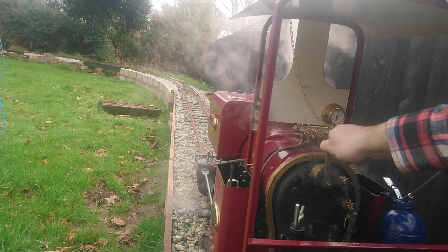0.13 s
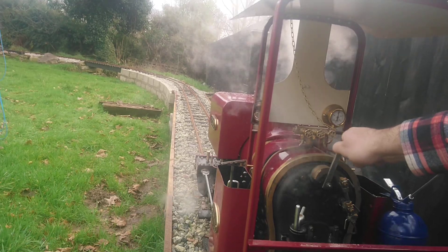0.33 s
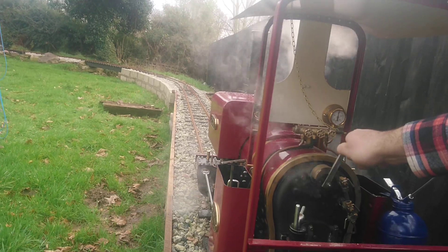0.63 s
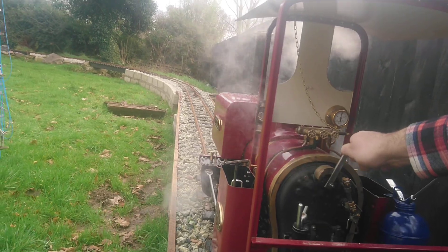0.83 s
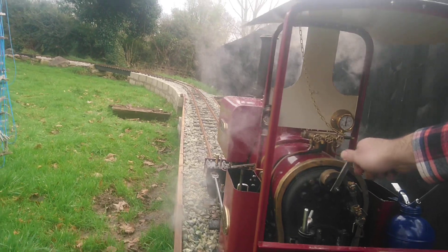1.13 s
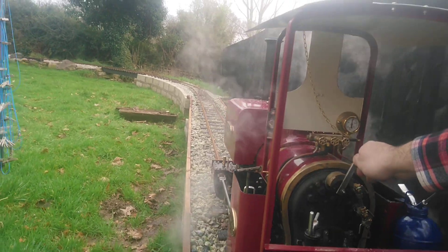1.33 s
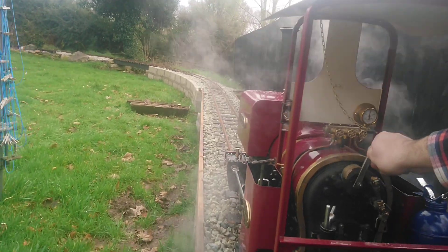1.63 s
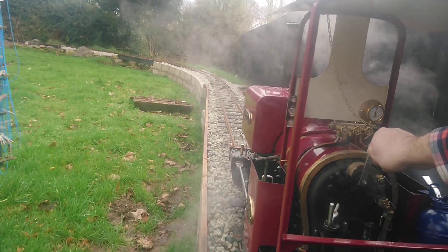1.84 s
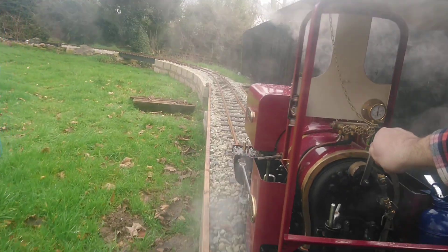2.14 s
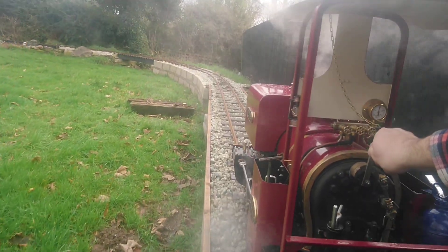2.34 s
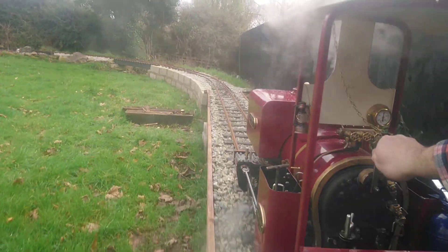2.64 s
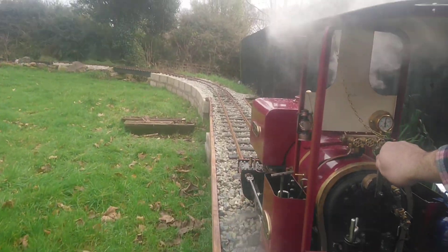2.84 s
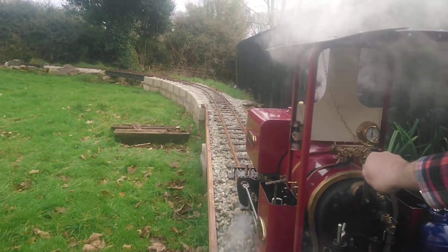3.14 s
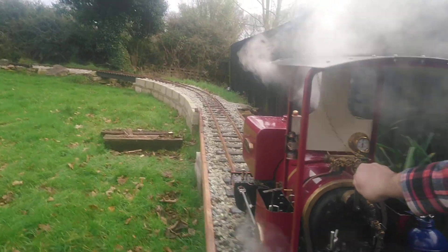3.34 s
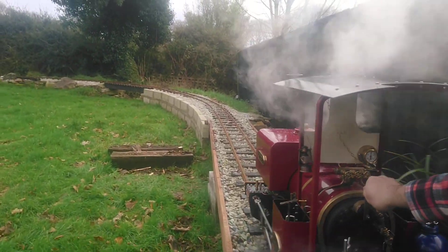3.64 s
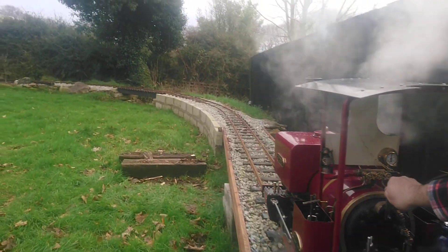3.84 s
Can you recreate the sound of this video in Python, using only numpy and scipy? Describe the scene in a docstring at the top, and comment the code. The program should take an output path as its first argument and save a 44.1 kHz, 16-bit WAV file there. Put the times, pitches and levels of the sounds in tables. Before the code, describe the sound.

A small steam locomotive pulls away on an outdoor garden track, heard close behind the cab: bright steam hiss, a metallic clank, then quickening chuffs over a growing wheel rumble and light rattle.

```python
"""A small steam locomotive pulls away on a garden track, heard from just behind the cab.
Steam first hisses from the open cylinder drains: shaped noise with a top fizz and a whistling edge.
Slack in the running gear closes with a clank, a sum of decaying modes; fainter knocks come later.
Then the chuffs quicken, bursts of noise ringing in the chimney over a draught that swells and sinks,
while the wheels rumble and rattle along the rails as noise and random taps through frame resonances."""
import sys
import numpy as np
from scipy import signal
from scipy.fft import rfft, irfft
from scipy.io import wavfile
from scipy.ndimage import map_coordinates

SR = 44100
rng = np.random.default_rng(int(sys.argv[2]) if len(sys.argv) > 2 else 0)


def generate_wav(signal):
    """Clip the signal to [-1, 1] and save it as 16-bit WAV at the path in sys.argv[1]."""
    frames = np.transpose(np.atleast_2d(signal))
    scaled = np.clip(frames, -1, 1) * 32767
    pcm = np.round(scaled).astype(np.int16)
    wavfile.write(sys.argv[1], SR, pcm)


N = 176400

# likeness of the two microphone signals: frequency_hz, coherence (0 to 1)
COHERENCE = [(60, 0.99), (250, 0.95), (700, 0.89), (1300, 0.54), (2400, 0.46), (4400, 0.58), (8000, 0.061),
             (15000, 0.35)]
# spectrum of rattling and shivering plates: frequency_hz, density_db (dB per Hz, relative)
PLATE_SPECTRUM = [(30, -70), (150, -27), (400, -3), (800, 0), (1300, -1), (2200, -11), (4000, -20),
                  (9000, -33)]


def amp(db):
    """Logarithmic level: decibels become an amplitude gain."""
    return 10 ** (np.asarray(db) / 20)


def evened(x):
    """Normalisation of mean power: scales to rms 1."""
    return x / np.sqrt(np.mean(x ** 2) + 1e-20)


def read(points, hz):
    """Logarithmic frequency scale: interpolates a table along log frequency."""
    f, value = np.transpose(points)
    return np.interp(np.log(hz + 1), np.log(f + 1), value)


def level(points):
    """Amplitude envelope: a level curve, linear in dB, as gain per sample."""
    return amp(np.interp(np.arange(N) / SR, *np.transpose(points)))


def add(mix, s, sound):
    """Linear superposition: mixes a sound in at time s."""
    part = mix[round(s * SR):][:len(sound)]
    part += sound[:len(part)]


def flutter(rate_hz, depth_db):
    """Random amplitude modulation: band-shaped noise sets a gain with an rms swing of depth_db."""
    hz = np.fft.rfftfreq(N, 1 / SR)
    band = hz / (hz + 8) / (1 + (hz / rate_hz) ** 2)
    swing = irfft(rfft(rng.standard_normal(N)) * band, N)
    return amp(depth_db * evened(swing))


def coherent_pair(a, b, coherence):
    """Partial coherence: the right spectrum shares a set part of the left one."""
    return np.array([a, coherence * a + np.sqrt(1 - coherence ** 2) * b])


def coloured(drive, colour, peaks):
    """Source and filter: two drives pass minimum-phase resonances and reach a microphone pair."""
    # left minus right level: frequency_hz, difference_db
    balance = [(60, 2.5), (300, -2), (900, 3.5), (1700, -2.5), (2800, 0.5), (4400, -6), (5400, 3),
               (6500, 13), (8000, 16), (11500, 27), (15000, 11)]
    hz = np.fft.rfftfreq(N, 1 / SR)
    a, b = rfft(drive)
    coherence = np.clip(read(COHERENCE, hz), -1, 1)
    ratio = amp(read(balance, hz))
    sides = np.array([ratio, np.ones_like(hz)]) / np.sqrt(1 + ratio ** 2)
    gain = amp(read(colour, hz)) * sides
    for centre, width, left, right in peaks:
        boost_db = np.array([[left], [right]]) / (1 + (2 * (hz - centre) / width) ** 2)
        gain = gain * amp(boost_db)
    # the Hilbert transform of the log gain gives the phase of a causal response
    mean_gain = gain.mean(0)
    log_gain = np.log(np.r_[mean_gain, mean_gain[-2:0:-1]])
    phase = -signal.hilbert(log_gain).imag[:len(hz)]
    return evened(irfft(coherent_pair(a, b, coherence) * gain * np.exp(1j * phase), N))


def sung(centre_hz, width_hz, pan_db):
    """Narrow-band resonance: noise rings at one pitch, panned left by pan_db, at rms 1."""
    hz = np.fft.rfftfreq(N, 1 / SR)
    resonance = 1 / (1 + 2j * (hz - centre_hz) / width_hz) ** 2
    a, b = rfft(rng.standard_normal((2, N))) * resonance
    left, right = coherent_pair(a, b, np.clip(read(COHERENCE, centre_hz), -1, 1))
    return evened(irfft(np.array([amp(pan_db) * left, right]), N))


def drifting(x, points):
    """Time warping: a varying reading speed slides all resonances together by a pitch factor."""
    place = np.cumsum(np.interp(np.arange(N) / SR, *np.transpose(points)))
    return np.array([map_coordinates(side, [place], order=3, mode="mirror") for side in x])


def exhaust():
    """Pulsed turbulent jet: each beat puffs up a resonant chimney with a bright spit at its onset."""
    # exhaust beats: start_s, level_db (before CHUFF_DB), hold_s (from start), fall_db_per_s
    chuffs = [(1.307, -14, .034, 120), (1.557, -13.5, .018, 160), (1.759, -13.5, .014, 220),
              (1.998, -22, .023, 230), (2.157, -17.5, .03, 135), (2.293, -20, .02, 180),
              (2.425, -19, .025, 100), (2.593, -25, .02, 140), (2.723, -20, .027, 120),
              (2.842, -20, .013, 340), (2.959, -18.5, .016, 105), (3.113, -24, .023, 140),
              (3.228, -19, .023, 145), (3.331, -23.5, .016, 210), (3.433, -16.5, .024, 135),
              (3.571, -21.5, .022, 160), (3.675, -16.5, .016, 270), (3.770, -24.5, .019, 180),
              (3.867, -22.5, .02, 80), (3.988, -23.5, .02, 150)]
    # chimney resonances: centre_hz, width_hz, left_boost_db, right_boost_db
    chimney = [(671, 180, 15, 17), (1288, 110, 16.5, 5), (1990, 156, 6.5, 16.5), (2480, 150, 6, 4.5),
               (2760, 154, 5.5, 12.5), (3350, 197, 8.5, 12.5), (4187, 140, -1, 9.5), (4440, 89, -5, 5.5)]
    # spectra of puff, spit and draught: frequency_hz, density_db (dB per Hz, relative)
    puff_spectrum = [(25, -55), (120, -4), (250, -17), (500, -5), (1000, -0.5), (1700, -1), (2700, 0),
                     (4400, 3.5), (7200, 1.5), (8000, -10.5), (9200, -4.5), (11000, -14.5), (16000, -11)]
    spit_spectrum = [(600, -28), (2000, -1.5), (4500, 6), (7200, 0.5), (8000, -15), (9500, -3.5),
                     (12000, -20), (16000, -17)]
    draught_spectrum = [(120, -21), (250, -3), (500, -10), (1000, -4), (1700, -3.5), (2700, -0.5),
                        (4400, -1.5), (7200, -4), (8000, -18), (9200, -11), (11000, -22), (16000, -35)]
    # draught through the chimney that swells and sinks under the beats: time_s, level_db
    draught_level = [(0, -66), (1.25, -39), (1.45, -36), (1.62, -38), (1.67, -24.5), (1.87, -22.5),
                     (1.97, -22.5), (2.13, -34.5), (2.55, -26.5), (2.7, -32), (2.94, -33), (3.08, -29.5),
                     (3.2, -35), (3.4, -32), (3.75, -34.5), (4, -36)]
    # draught pitch, following the heat of the steam: time_s, pitch_factor
    heat = [(1.3, 0.97), (1.7, 1.027), (2.001, .995), (2.3, 1.015), (2.65, .985), (3.0, 1.03), (4, 1.07)]
    # lowest chimney resonance: time_s, level_db
    hollow_level = [(.1, -76), (.45, -49.5), (.7, -38), (1.25, -40.5), (1.35, -39), (1.55, -40),
                    (1.83, -22.5), (2.08, -37), (2.2, -28), (2.6, -25), (2.95, -35.5), (4, -34.5)]
    CHUFF_RISE_S, CHUFF_DB = 0.0072, -2.5
    SPIT_S, SPIT_DB = 0.0084, -3  # time to peak, level against the puff
    BOOM_LAG_S, BOOM_DB = 0.024, -5  # the smokebox booms just after each puff

    t = np.arange(SR // 2) / SR
    puff_power, boom_power, spit_power = np.zeros((3, N))
    for start, db, hold, fall in chuffs:
        rise = np.minimum(t / CHUFF_RISE_S, 1)
        puff = rise * amp(CHUFF_DB + db - fall * np.maximum(t - hold, 0))
        spit = amp(CHUFF_DB + db + SPIT_DB) * (t / SPIT_S * np.exp(1 - t / SPIT_S)) ** 2
        # overlapping beats add in power
        add(puff_power, start, puff ** 2)
        add(boom_power, start + BOOM_LAG_S, puff ** 2)
        add(spit_power, start, spit ** 2)

    turbulence = rng.standard_normal((3, 2, N)) * flutter(200, depth_db=1)
    puffs = np.sqrt(puff_power) * coloured(turbulence[0], puff_spectrum, chimney)
    spits = np.sqrt(spit_power) * coloured(turbulence[2], spit_spectrum, [])
    boom = amp(BOOM_DB) * np.sqrt(boom_power) * sung(252.4, width_hz=85, pan_db=-0.5)
    draught = drifting(coloured(turbulence[1], draught_spectrum, chimney), heat)
    draught = level(draught_level) * draught * flutter(32, depth_db=1.2)
    hollow = level(hollow_level) * sung(662, width_hz=61.5, pan_db=1.0)
    return puffs + spits + boom + draught + hollow


def drains():
    """Jet noise: steam rushes from the drain cocks with a smooth fizz on top and a whistling edge."""
    # escaping steam that builds, swells again and dies away: time_s, level_db
    leak_level = [(.1, -48.5), (.2, -31.5), (.3, -23.5), (.5, -22), (.8, -23.5), (1.0, -27), (1.15, -33),
                  (1.28, -33.5), (1.6, -30.5), (1.8, -23.5), (2.13, -36.5), (2.55, -45), (4, -50.5)]
    # top fizz of the jets, whistling jet edge: time_s, level_db
    fizz_level = [(.1, -51), (.2, -37), (.32, -27.5), (.7, -32), (1.16, -33), (1.19, -38.5), (1.8, -38),
                  (2.15, -43), (4, -42)]
    whistle_level = [(.1, -62), (.5, -35), (.92, -31.5), (.99, -24), (1.06, -32.5), (1.27, -38), (1.5, -38),
                     (4, -64)]
    # spectra of steam and fizz: frequency_hz, density_db (dB per Hz, relative)
    leak_spectrum = [(400, -8), (900, -17), (1150, -5.5), (1700, -6), (2300, 3), (3100, 0.5), (4600, 0.5),
                     (7400, 5), (8100, -14), (16000, -7)]
    fizz_spectrum = [(3000, -24), (7000, 9), (8000, 5), (9200, 9), (11500, 7), (14000, 6.5), (15000, 11),
                     (15800, -6)]
    # resonances round the jets: centre_hz, width_hz, left_boost_db, right_boost_db
    jet_resonances = [(3000, 190, -30, 11), (3260, 200, 15, 5), (3700, 340, 4, 9), (4020, 260, -10, 8),
                      (4550, 330, 9, 7), (5520, 180, -0.5, 14)]
    body = coloured(rng.standard_normal((2, N)), leak_spectrum, jet_resonances) * level(leak_level)
    fizz = coloured(rng.standard_normal((2, N)), fizz_spectrum, []) * level(fizz_level)
    whistle = sung(3100, width_hz=630, pan_db=-9) * level(whistle_level)
    return (body + fizz + whistle) * flutter(35, depth_db=.6)


def struck(modes):
    """Modal decay: one blow excites a sum of sinusoids that die exponentially."""
    t = np.arange(SR // 4) / SR
    out = np.zeros(len(t))
    for hz, db, t60 in modes:
        out += amp(db - 60 * t / t60) * np.sin(2 * np.pi * (hz * t + rng.random()))
    return np.minimum(t / 0.00081, 1) * out  # contact rise in s


def knocks():
    """Impact excitation: slack closes, steel clanks over a dull frame thud, and the plates shiver on."""
    # knocks of coupling and running gear: start_s, ring_db, thud_db
    blows = [(.773, -33, -55), (.812, -16, -18), (.829, -34, -20), (.861, -28, -35), (2.045, -30, -29),
             (2.632, -27, -30), (2.85, -29, -25), (3.6, -30, -30), (3.872, -32, -33)]
    # modes of the steel and of the frames: frequency_hz, level_db (within the blow), t60_s
    ring_modes = [(723, -3, .055), (870, -4, 0.073), (986, 0.5, .1), (1180, -7, 0.044), (1380, -15, 0.12),
                  (1800, -17, .04)]
    thud_modes = [(160, -13, 0.039), (305, 3, 0.067), (381, 1.5, 0.078), (480, -9, 0.041)]
    SHIVER_DB, SHIVER_T60_S = -9, .13  # level against the ring, decay time
    t = np.arange(SR // 4) / SR
    out, shaking = np.zeros((2, N))
    for start, ring_db, thud_db in blows:
        add(out, start, amp(ring_db) * struck(ring_modes) + amp(thud_db) * struck(thud_modes))
        add(shaking, start, amp(ring_db + SHIVER_DB - 60 * t / SHIVER_T60_S))
    return out + shaking * coloured(rng.standard_normal((2, N)), PLATE_SPECTRUM, [])


def wheels():
    """Roughness excitation: the rails shake frames and plates, and loose parts chatter in random taps."""
    # rolling (before ROLL_DB and RATTLE_DB), drumming plates, deep rumble: time_s, level_db
    roll_level = [(.12, -76), (.22, -61), (.45, -46.5), (.7, -36), (.9, -30), (1.05, -36), (1.3, -31),
                  (1.4, -27), (1.75, -21.5), (2.25, -20), (2.4, -23.5), (2.5, -18), (2.7, -23), (2.88, -18),
                  (2.95, -25), (3.55, -21), (4, -20)]
    drum_level = [(.1, -88), (1.25, -51), (1.6, -32.5), (2.5, -30.5), (3.2, -26), (3.45, -26), (3.68, -21),
                  (4, -25.5)]
    deep_level = [(.1, -84), (.3, -77), (.42, -52), (1.2, -43.5), (1.7, -40.5), (4, -51)]
    # spectra of rolling and deep rumble: frequency_hz, density_db (dB per Hz, relative)
    roll_spectrum = [(20, -56), (55, -23), (100, -5.5), (150, -1), (250, 2.5), (320, 0.5), (480, -18),
                     (900, -12), (1600, -21.5), (3000, -29), (8000, -44.5)]
    deep_spectrum = [(15, -65), (25, -38), (36, -34), (52, 4.5), (80, 2), (130, -10), (250, -26),
                     (800, -69)]
    # resonances of frames and plates: centre_hz, width_hz, left_boost_db, right_boost_db
    frames = [(236.8, 32.2, 12.5, 12), (1291, 89, 7.5, 4.5), (2010, 190, 10.5, 7)]
    ROLL_DB, RATTLE_DB = 0.5, -14.5
    RATTLE_PER_S, RATTLE_SPREAD_DB = 74, 9.5

    rumble = coloured(rng.standard_normal((2, N)), roll_spectrum, frames)
    hits = rng.random(N) < RATTLE_PER_S / SR
    taps = hits * amp(RATTLE_SPREAD_DB * rng.random(N))
    bursts = signal.lfilter([1], [1, -np.exp(-1 / (0.0064 * SR))], taps)  # decay constant in s
    rattle = coloured(rng.standard_normal((2, N)) * bursts, PLATE_SPECTRUM, frames[1:])
    rolling = level(roll_level) * (amp(ROLL_DB) * rumble + amp(RATTLE_DB) * rattle)
    plates = level(drum_level) * sung(377, width_hz=127, pan_db=-4)
    deep = level(deep_level) * coloured(rng.standard_normal((2, N)), deep_spectrum, [])
    return rolling + plates + deep


def cab(x, wet_db, spread_s, count=14):
    """Early reflection: cab sheets and boiler return delayed copies, different on each side."""
    delay = rng.uniform(.03, 1, (2, count))  # as a fraction of the spread
    taps = np.zeros((2, SR // 4))
    for side in range(2):
        place = (delay[side] * min(spread_s, .1) * SR).astype(int)
        strength = rng.choice([-1, 1], count) * np.exp(-delay[side])
        taps[side, place] = amp(wet_db) * evened(strength) / np.sqrt(count)
    highpass = signal.butter(2, 1500, "high", fs=SR, output="sos")
    echo = signal.sosfilt(highpass, signal.fftconvolve(x, taps, axes=1)[:, :N])
    return (x + echo) / np.sqrt(1 + amp(wet_db) ** 2)


def scene():
    """Superposition: exhaust and drains with their reflections, knocks and wheels direct."""
    chuffing = cab(exhaust(), wet_db=-5.5, spread_s=.009)
    hissing = cab(drains(), wet_db=-6, spread_s=.015)
    return chuffing + hissing + knocks() + wheels()


def record(dry):
    """Saturation and band limiting: the sound fades in, peaks are rounded and the top is cut."""
    OPEN_S, FADE_S, EDGE_HZ = 0.12, 0.013, 15950
    opened = dry * np.clip((np.arange(N) / SR - OPEN_S) / FADE_S, 0, 1)
    rounded = opened / (1 + (opened / .65) ** 4) ** (1 / 4)  # approaches .65 of full scale
    lowpass = signal.firwin(1023, EDGE_HZ, window=("kaiser", 9), fs=SR)
    return signal.oaconvolve(rounded, lowpass[None], "same")


dry = scene()
out = record(dry)
generate_wav(out)
```